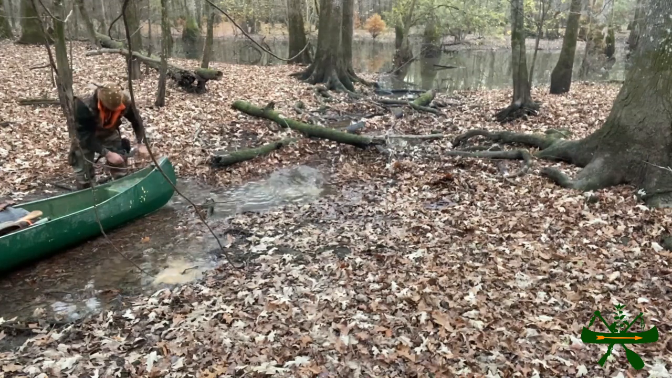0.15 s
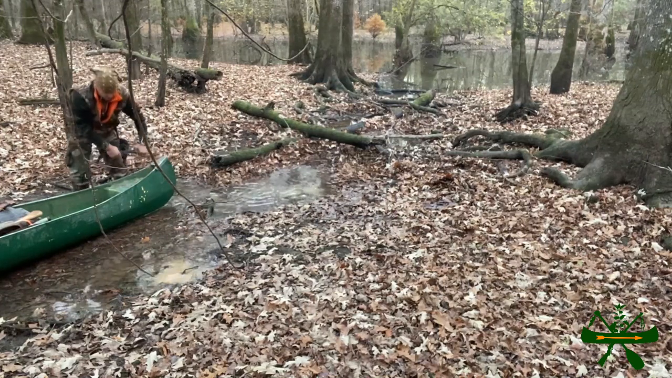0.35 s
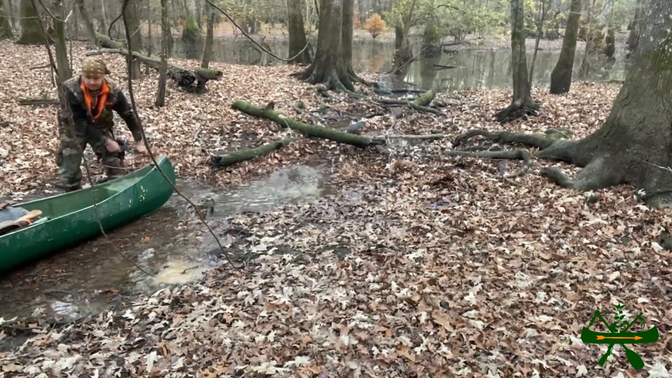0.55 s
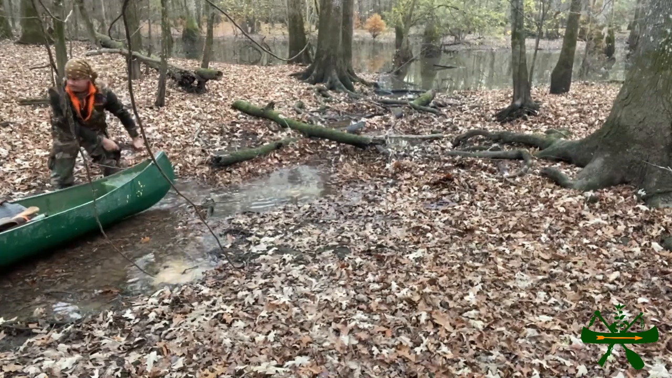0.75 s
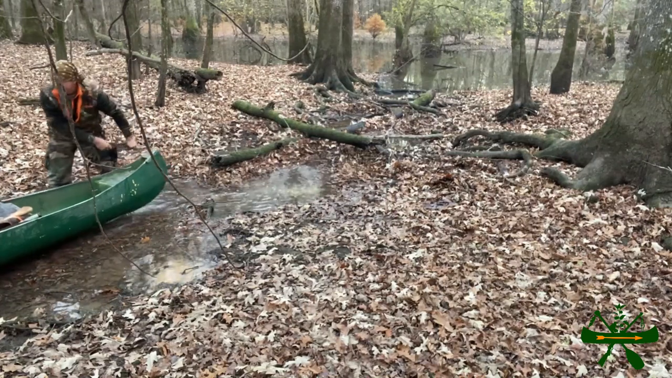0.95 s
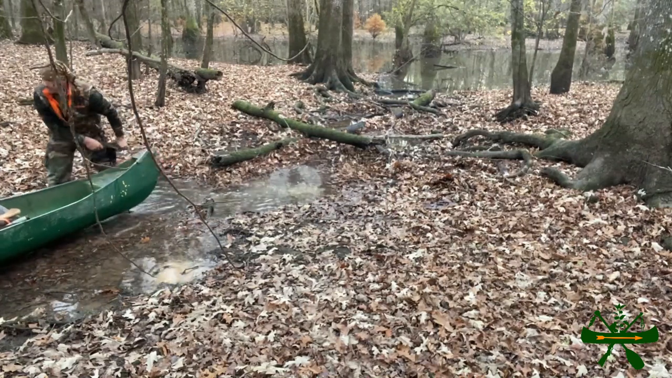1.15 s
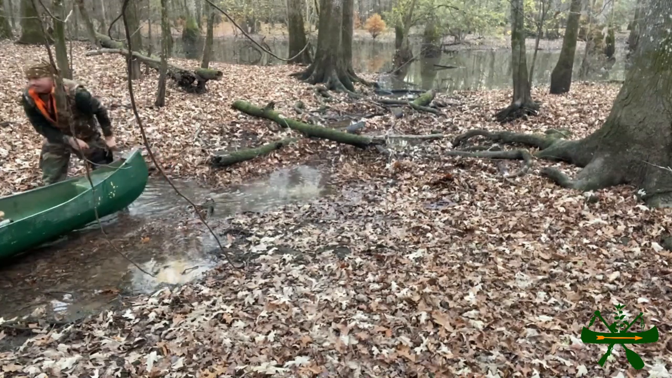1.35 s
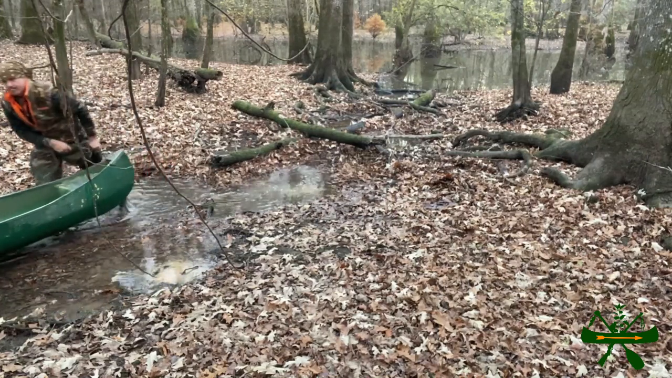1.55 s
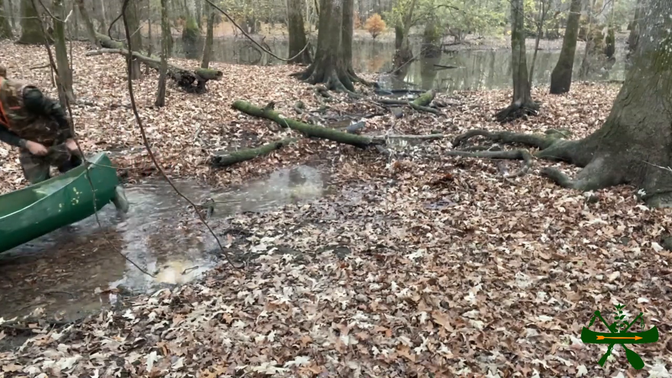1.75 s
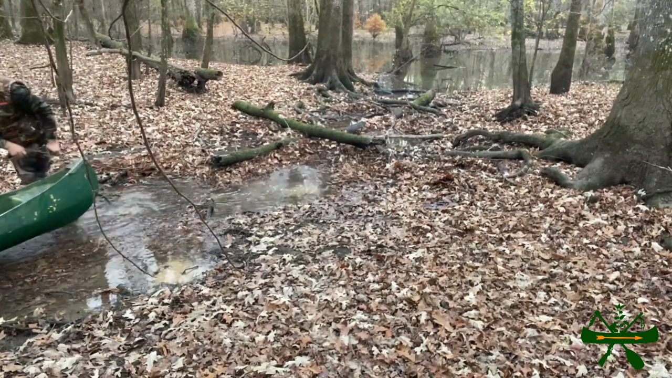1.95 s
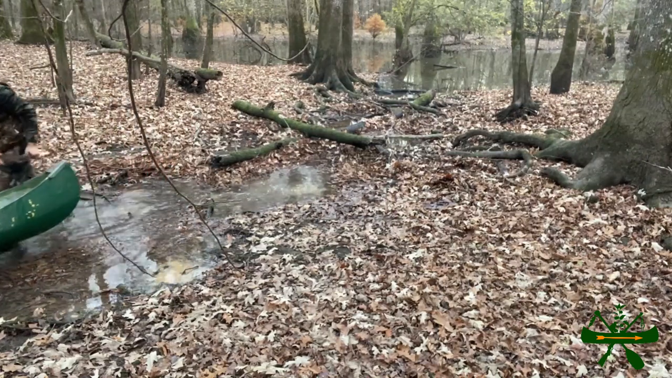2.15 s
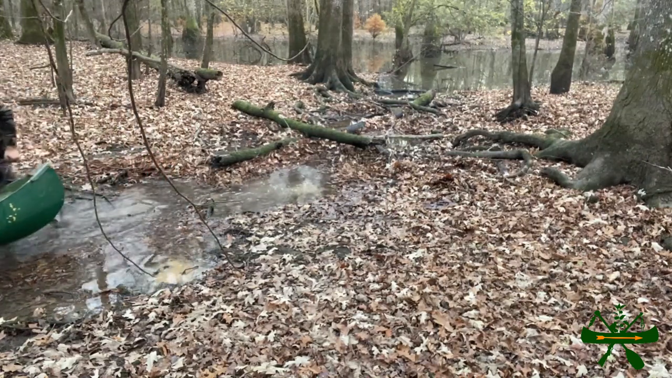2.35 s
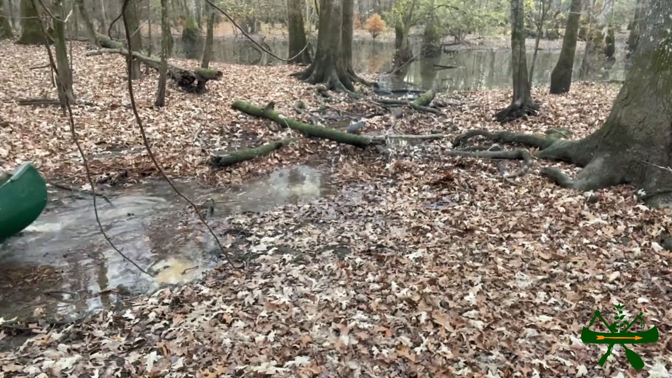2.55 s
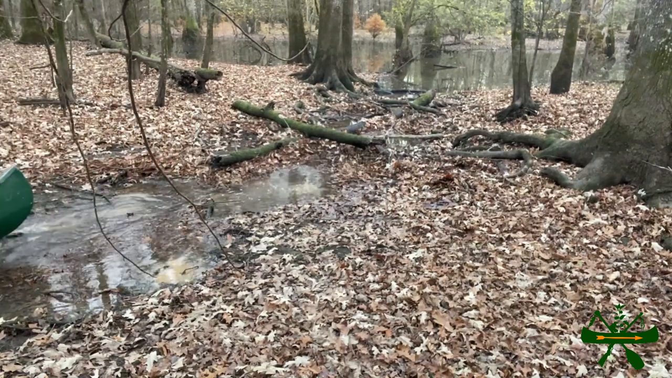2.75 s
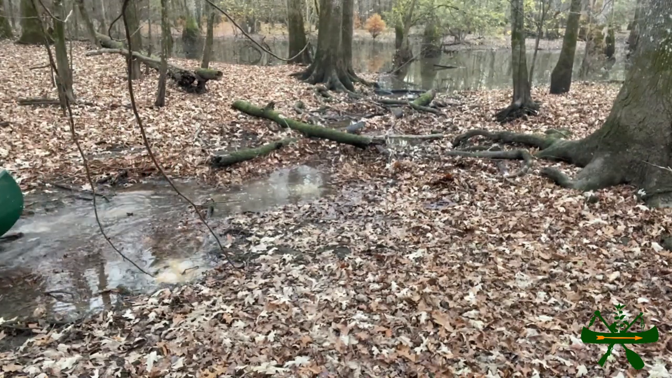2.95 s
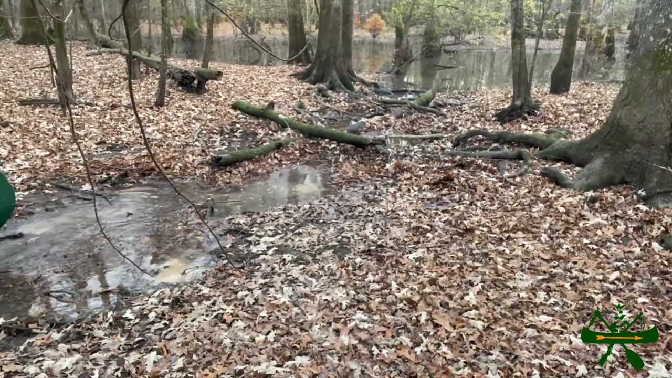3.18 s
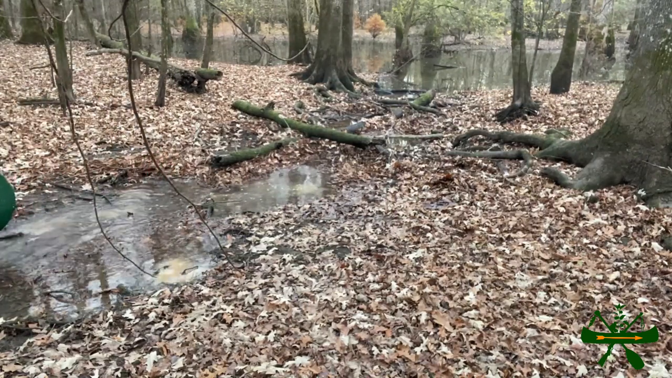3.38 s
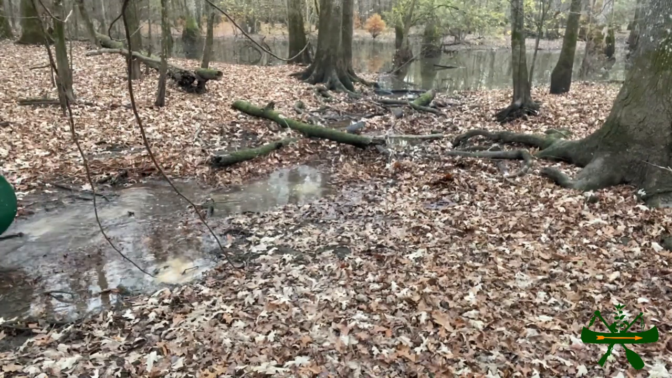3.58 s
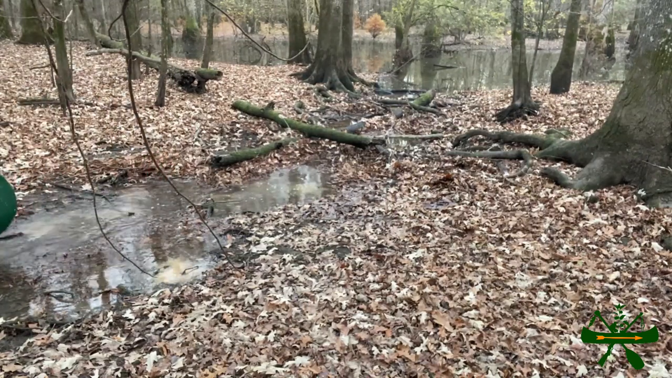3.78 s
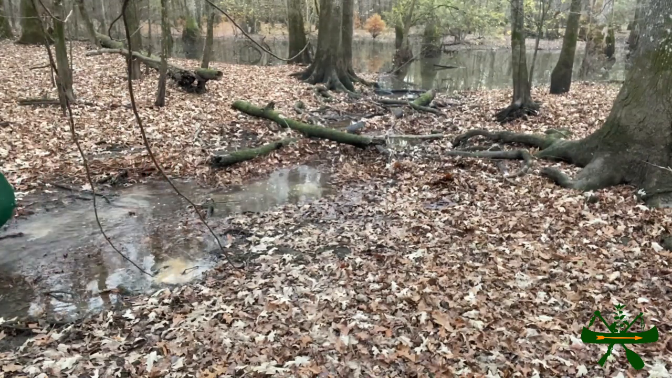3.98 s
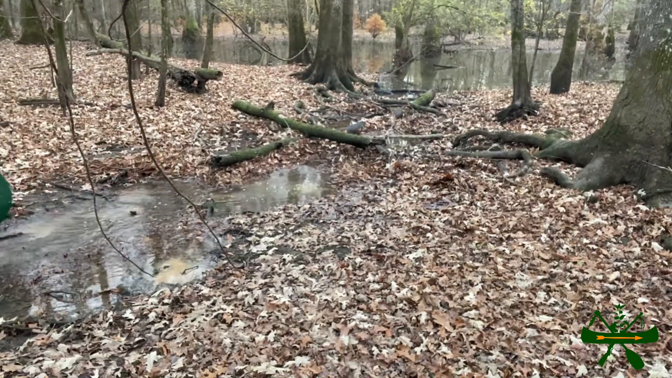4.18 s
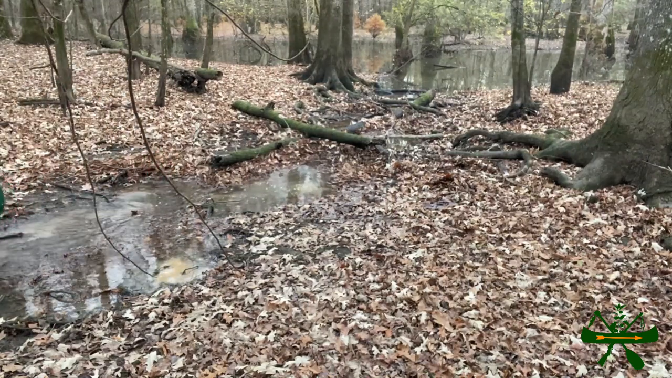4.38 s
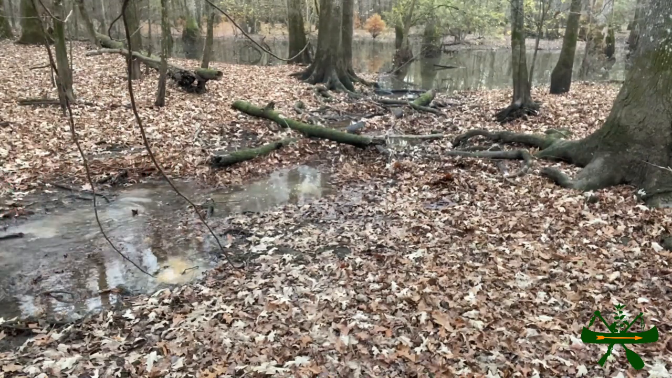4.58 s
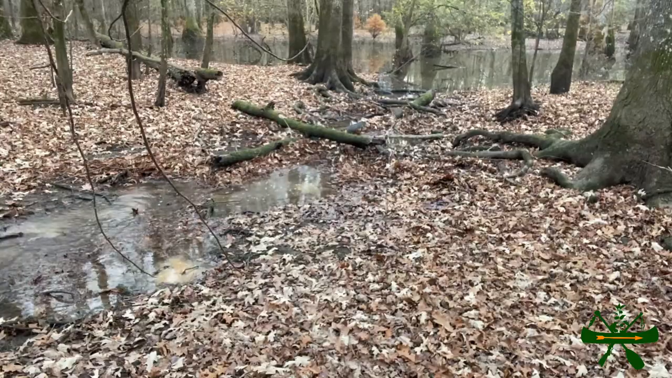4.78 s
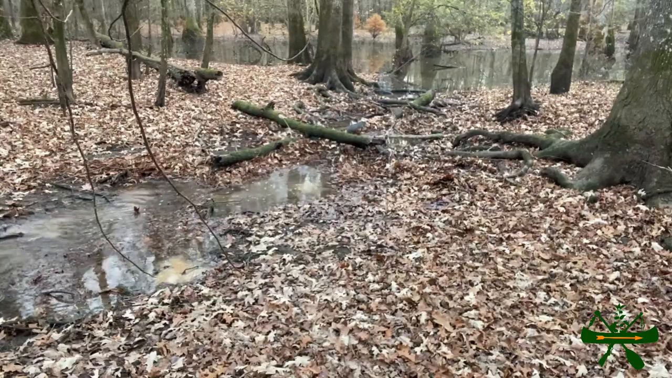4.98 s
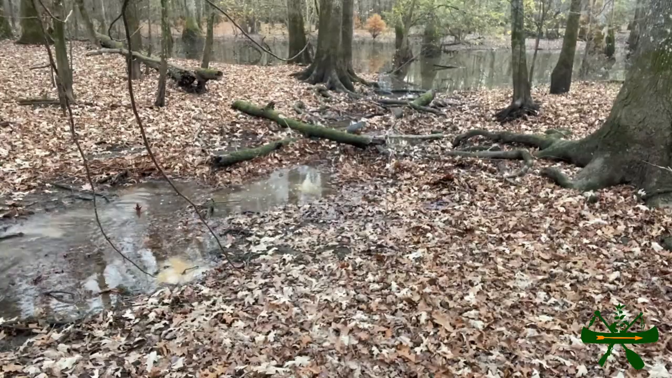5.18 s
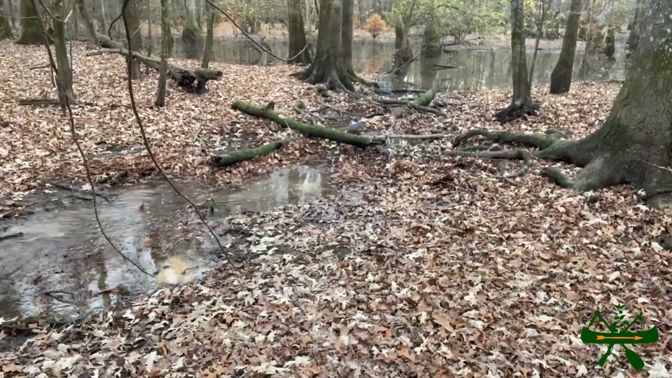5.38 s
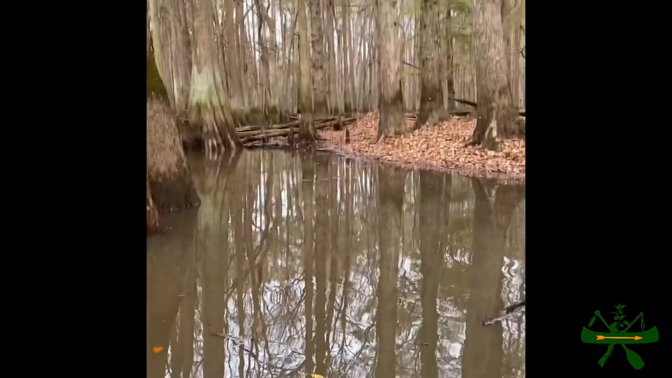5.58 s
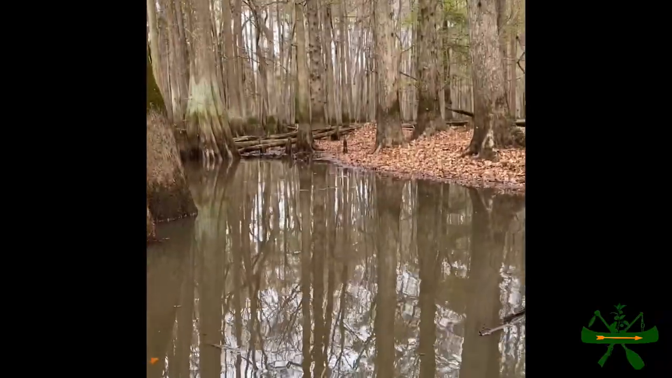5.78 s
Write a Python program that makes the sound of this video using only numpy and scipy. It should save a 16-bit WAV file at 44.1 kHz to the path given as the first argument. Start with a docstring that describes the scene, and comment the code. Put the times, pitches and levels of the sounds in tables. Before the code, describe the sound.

Wet, gritty dragging of a boat builds close by, hollow hull bangs ring out, then fainter sliding, small crackles and near silence.

```python
"""A canoe is dragged through a swamp forest, each sound shaped from noise or decaying sines.
A soft start grows into a near scrape over wet leaves and shallow water: friction noise with a keel hum.
Knocks ring the hull modes amid snapping twigs, rustles and short tones, mostly bubbles and drips.
The near scrape stops short; the boat slides on further away, fainter, over a low drone and faint hiss.
At the end the level dips briefly and the place changes to a duller stretch of still water."""
import sys
import numpy as np
from scipy import signal
from scipy.fft import rfft, irfft, next_fast_len
from scipy.io import wavfile
from scipy.ndimage import uniform_filter1d

SR = 44100
rng = np.random.default_rng(int(sys.argv[2]) if len(sys.argv) > 2 else 0)


def inscribe(sig):
    """Save sig as 16-bit PCM at rate SR to the path in sys.argv[1].

    A 1-D sig is mono; a 2-D sig holds one channel per row.
    Samples are clipped to [-1, 1] before scaling.
    """
    pcm = np.round(np.clip(np.atleast_2d(sig).T, -1, 1) * 32767)
    wavfile.write(sys.argv[1], SR, pcm.astype(np.int16))


N = 256918  # samples

# All levels are those at the source, before the microphone; spectra are relative.
# how hard the hull drags, heard as the scrape level, one list a stretch: time_s, scrape_db
SLIDES = [
    [(0.0, -60), (0.37, -64.5), (0.597, -58)],
    [(0.6, -50), (0.75, -50), (0.98, -46.5), (1.74, -42), (2.52, -45), (2.7, -46.5)],
    [(2.7, -61.5), (3.2, -63.5), (3.45, -62), (3.65, -69), (3.9, -67.5), (4.2, -65), (4.5, -60.5),
     (4.87, -58.5), (5.3, -57.5), (5.5, -60)],
    [(5.505, -58.5), (5.667, -62.5), (5.826, -62.5)],
]
# rumble and fizz at the hardest drag of each stretch: hull_rumble_db, leaf_and_water_fizz_db
STRONGEST = [(-48.5, -62.5), (-49, -45), (-64.5, -55), (-58, -69)]
# friction spectrum of each stretch: frequency_hz, density_db
START_SPECTRUM = [(24, -39), (40, -6.5), (117, -10.5), (213, -24.5), (418, -19), (564, -21), (655, -14),
                  (3580, -35.5), (15600, -55)]
NEAR_SPECTRUM = [(24, -57.5), (40, -25), (64, 1), (179, 4), (334, -9), (1140, -6.5), (1290, -12),
                 (1970, -3.5), (2520, -14.5), (8370, -16.5), (15600, -36)]
AWAY_SPECTRUM = [(24, -50), (40, -11), (61, -4.5), (150, 7.5), (624, -26), (930, -17.5), (1650, -10.5),
                 (2400, -20.5), (4830, -2), (9020, -3.5), (15600, -20)]
STILL_SPECTRUM = [(24, -34), (40, 1), (80, -2), (147, -1), (183, -8), (408, -12.5), (624, -16), (1050, -20),
                  (1160, -21.5), (1780, -15), (2790, -36), (15600, -46)]
# broad resonant humps on each spectrum: centre_hz, width_hz, lift_db
START_HUMPS = [(1830, 710, 8.4), (3500, 400, 5.8)]
NEAR_HUMPS = [(1030, 370, -1), (2100, 690, -2), (3830, 800, 8.5), (5200, 400, 0.5), (6610, 200, 4)]
AWAY_HUMPS = [(619, 305, 17), (1320, 240, 3.5), (2400, 130, -5), (3160, 270, 3.5), (4100, 260, 4.5),
              (6500, 100, -2)]
STILL_HUMPS = [(537, 240, 3), (1790, 75, 9), (3430, 400, 7.4)]
# bending modes of the hull, before each blow alters them: frequency_hz, level_db, t60_s
HULL_MODES = [(100, -17, 0.28), (141.6, 0, 0.14), (164, -1, 0.12), (216.2, -0.5, 0.14), (243.7, -2.5, 0.12),
              (309.3, -2.5, 0.099), (339.7, -2.5, 0.1), (424.7, -6, 0.1), (469.3, -9, 0.19), (548, -9, 0.1),
              (699.5, -5, 0.091), (758, -14.5, 0.26), (828.4, -9.5, 0.11), (845, -16, 0.24),
              (1000, -14, 0.13), (1083, -7.5, 0.095), (1184, -8, 0.084), (1357, -12.5, .07),
              (1430, -16.5, 0.13), (1629, -11, 0.11), (1727, -10.5, 0.11), (1764, -6.5, 0.068),
              (1933, -9, 0.11), (2020, -18, 0.18), (2261, -10.5, 0.055), (2420, -23, 0.03),
              (3294, -24, 0.035), (3280, -27, 0.11)]
# blows on the hull: start_s, modes_peak_db, hardness_db_per_octave, favoured_mode_hz, ring_factor
KNOCKS = [(.002, -34.5, -6, 140, 0.67), (.246, -43, -2.5, 120, 0.63), (0.596, -29.5, -2, 207, 0.42),
          (1.042, -39, -13, 113, 1.6), (1.0481, -28, -0.5, 163, .45), (1.081, -30, -2.5, 144, 0.38),
          (1.119, -32, -1, 248, 0.44), (1.335, -31, 1, 250, 0.6), (1.415, -30, 1.5, 250, 0.35),
          (1.857, -27.5, -5.5, 199, 0.5), (1.9261, -7, -2, 174.5, 0.66), (1.955, -13.5, -2.5, 127.5, 0.72),
          (2.157, -4.5, 0.15, 172, 0.54), (2.2, -11.5, -2, 208, 0.88), (2.963, -31, -1, 214, 1.3),
          (3.01, -31.5, -4.5, 165, 2), (3.048, -32, -2, 165, 1.4), (3.086, -23.5, -0.5, 179, 0.42),
          (3.111, -34, -2.2, 152, 1.9), (3.434, -50.5, -14, 144, 2.1), (3.907, -43.5, -8, 142, 0.26),
          (3.929, -43.5, -7, 137, 0.8), (3.95, -49, -5, 150, 0.79), (4.805, -48, -3.5, 170, .5),
          (5.27, -48, -2, 170, .6), (5.44, -48.5, -3, 170, .6)]
# leaves and twigs snapping: start_s, nominal_peak_db, centre_hz
SNAPS = [(0.1523, -42, 6050), (.3326, -52, 6000), (0.5958, -22, 2860), (0.7146, -30, 3640),
         (2.1584, -22, 2500), (2.8382, -27.5, 4500), (3.0362, -39, 5030), (3.0827, -23.5, 4740),
         (3.111, -33, 4000), (3.306, -37.5, 5100), (3.389, -36, 5830), (3.4336, -39.5, 5020),
         (3.552, -46, 4000), (3.82, -47.5, 6000), (3.866, -46.5, 2960), (4.007, -49, 4200),
         (4.1644, -46, 5460)]
# leaves rustling and water stirred: start_s, rms_db before shaping, centre_hz, length_s
RUSTLES = [(.075, -60, 1430, 0.078), (0.169, -59.5, 1500, 0.044), (0.241, -62, 1190, 0.055),
           (1.035, -47, 600, 0.14), (2.81, -48, 6270, 0.087), (2.99, -38.5, 85, 0.14),
           (3.029, -52, 1330, 0.13), (3.178, -64, 4470, 0.04), (3.287, -67.5, 6000, 0.059),
           (3.352, -60, 5940, .07), (3.571, -65, 6020, 0.055)]
# bubbles, drips and one narrow, pitched snap near 3.5 kHz: start_s, nominal_peak_db, starting_pitch_hz
SHORT_TONES = [(.133, -44.5, 2510), (.185, -47, 2530), (0.754, -38, 1810), (.926, -30.5, 3470),
               (1.22, -33.5, 1035), (2.327, -27.5, 930), (3.946, -53, 1727), (4.003, -48.5, 450),
               (4.025, -44, 563), (4.314, -45, 4150), (4.315, -50, 3300), (5.543, -55, 1830)]
# treble bands lifted by the microphone: centre_hz, width_hz, lift_db
MICROPHONE_HUMPS = [(5080, 740, 5), (8600, 600, 2.5)]

RUMBLE_FOLLOWS, FIZZ_FOLLOWS = 0.87, 1.86  # dB lost for each dB that the scrape loses
# the keel hums as it rubs: final pitch, level over the scrape, depth of its slow swell
KEEL_HZ, KEEL_DB, KEEL_SWELL_DB = 1983, -8.5, 0.5
KEEL_START_HZ, KEEL_CLIMB_S = 1602, .15  # it climbs as the boat gathers speed
FAR_FROM_S = 2.7  # later blows land on the wide middle of the hull, which rings lower and rubs less
SNAP_T60_S = 0.022
# lower tones, as of larger bubbles, ring longer and climb faster; values at 1 kHz (s, octaves a second)
TONE_T60_S, TONE_RISE = 0.038, 1.7
FAR_RUMBLE_DB, AIR_DB = -61.5, -76.5  # low drone of the distance, mean level of the air hiss
MOVE_AT_S = 5.505  # the place changes
EDGE_HZ = 15750  # upper band limit


def gain_of(db):
    """Decibel law: 20 dB is a tenfold amplitude."""
    return 10 ** (np.asarray(db) / 20)


def evened(x):
    """Normalisation to unit rms."""
    return x / np.sqrt(np.mean(abs(x) ** 2) + 1e-20)


def smooth_noise(count, size):
    """Low-pass filtering: noise averaged twice leaves a slow random curve of unit rms."""
    once = uniform_filter1d(rng.standard_normal(count), size=size)
    return evened(uniform_filter1d(once, size=size))


def read(points, hz):
    """Interpolation of a spectrum along log frequency."""
    f, value = np.transpose(points)
    return np.interp(np.log(hz + 1), np.log(f + 1), value)


def lift_db(humps, hz):
    """Resonance: a sum of bell-shaped lifts."""
    return sum(db / (1 + (2 * (hz - centre_hz) / width_hz) ** 2) for centre_hz, width_hz, db in humps)


def band_noise(count, hz, spread):
    """Band-pass filtering: unit-rms noise between hz / spread and hz * spread."""
    band = signal.butter(2, [hz / spread, min(hz * spread, 20000)], "band", fs=SR)
    return evened(signal.lfilter(*band, rng.standard_normal(count)))


def add(mix, s, sound):
    """Superposition: adds a sound to the mix from time s."""
    part = mix[max(round(s * SR), 0):][:len(sound)]
    part += sound[:len(part)]


def slide(rows, strongest, spectrum, humps, patchy_db, flicker_db, grit):
    """Sliding friction: countless slips make noise whose rumble, scrape and fizz follow the drag."""
    s, scrape_db = np.transpose(rows)
    eased_db = scrape_db - scrape_db.max()
    rumble_db = strongest[0] + RUMBLE_FOLLOWS * eased_db
    fizz_db = strongest[1] + FIZZ_FOLLOWS * eased_db
    t = np.arange(s[0], s[-1], 1 / SR)

    # tiny slips, a few of them larger
    slip_db = grit * np.minimum(rng.exponential(1, len(t)), 6)
    slips = rng.standard_normal(len(t)) * gain_of(slip_db)

    # colour the noise, with patches that vary in time and frequency
    hz, frames, z = signal.stft(slips, SR, nperseg=1024, noverlap=896)
    patches = rng.standard_normal((len(hz), len(frames)))
    patches = uniform_filter1d(patches, size=14, axis=0)
    patches = evened(uniform_filter1d(patches, size=14, axis=1))
    colour_db = read(spectrum, hz) + lift_db(humps, hz)
    z = z * gain_of(colour_db[:, None] + patchy_db * patches)

    # the contact with the leaves comes and goes many times a second
    flicker = smooth_noise(len(t), 500)
    low = 1 / (1 + (hz / 300) ** 8)
    high = 1 / (1 + (2800 / (hz + 1)) ** 12)
    out = np.zeros(len(t))
    # each layer: share of the power, level, and how far the flicker reaches it
    layers = [(low, rumble_db, .3), (1 - low - high, scrape_db, 1), (high, fizz_db, 1)]
    for share, level_db, shake in layers:
        layer_z = z * np.sqrt(abs(share))[:, None]
        layer = signal.istft(layer_z, SR, nperseg=1024, noverlap=896)[1][:len(t)]
        layer = evened(layer * gain_of(shake * flicker_db * flicker))
        out += layer * gain_of(np.interp(t, s, level_db))
    edge = np.minimum(np.minimum(t - s[0], s[-1] - t) / 0.00073 + 0.39, 1)  # near-abrupt ends
    return s[0], out * edge


def keel():
    """Frequency shifting: narrow low-pass noise moved up to a gliding pitch is a fuzzy hum."""
    s, scrape_db = np.transpose(SLIDES[1])
    t = np.arange(s[0], s[-1], 1 / SR)
    pole = np.exp(-np.pi * 230 / SR)  # 230 Hz bandwidth
    real, imaginary = rng.standard_normal((2, len(t)))
    swell = smooth_noise(len(t), 3000)
    hz = KEEL_HZ - (KEEL_HZ - KEEL_START_HZ) * np.exp(-(t - s[0]) / KEEL_CLIMB_S)
    carrier = np.exp(2j * np.pi * np.cumsum(hz) / SR)
    hum = signal.lfilter([1], [1, -pole], real + 1j * imaginary) * carrier
    level_db = np.interp(t, s, scrape_db) + KEEL_DB + KEEL_SWELL_DB * swell
    return s[0], gain_of(level_db) * evened(hum.real)


def knock(peak_db, hardness_db, favoured_hz, ring, pitch, rub):
    """Modal vibration: bending waves spread unevenly, so treble speaks at once and bass swells later."""
    hz, db, t60 = np.transpose(HULL_MODES)[:, :, None]
    hz = hz * np.where(hz > 600, pitch, 1)
    t = np.arange(round(.35 * SR)) / SR
    ring = max(ring, .1)

    # each blow lands on another spot, which favours the low mode that bends most there
    touch = rng.standard_normal((len(HULL_MODES), 2))
    spot_db = lift_db([(favoured_hz, 34, 9)], hz) + 1.4 * touch[:, :1]
    level_db = db + spot_db + hardness_db * np.log2(hz / 200) - 60 * t / (t60 * ring)
    swell = (1 - np.exp(-t * hz / 1.08)) ** 2

    # the hull keeps rubbing as it rings, which shakes the phase, most of all of the upper modes
    shake = uniform_filter1d(rng.standard_normal((len(HULL_MODES), len(t))), size=60, axis=1)
    drift = .06 * rub * np.cumsum(shake, axis=1) * np.minimum(hz / 500, 1) ** 2
    phase = 2 * np.pi * hz * (1 + 0.0042 * touch[:, 1:]) * t + drift
    modes = (gain_of(level_db) * swell * np.sin(phase)).sum(0)

    # the many small panels between the ribs add a dull rattle
    band = signal.butter(2, [250, 2300 * pitch], "band", fs=SR)
    rattle = signal.lfilter(*band, rng.standard_normal(len(t)))
    rattle *= rub * gain_of(-4.0 + 1.3 * hardness_db - 60 * t / (0.13 * ring))
    return gain_of(peak_db) * (modes + rattle) / abs(modes).max()


def snap(peak_db, hz, t60):
    """Impulsive fracture: a burst of noise around one centre, dying quickly."""
    t = np.arange(round(.15 * SR)) / SR
    level_db = peak_db - 12 - 60 * t / max(t60, .003)  # 12 dB from peak down to rms
    return gain_of(level_db) * band_noise(len(t), hz, 1.57) * np.minimum(t / 0.00055, 1)


def rustle(db, hz, length):
    """Random superposition: a dense clump of crackles starts quickly and thins out."""
    u = np.arange(round(.15 * SR)) / SR / length  # share of the length gone by
    clumps = evened(uniform_filter1d(rng.standard_normal(len(u)), size=200))
    shape = np.minimum(u / 0.068, 1) * np.clip(1 - u ** 1.4, 0, 1)
    return gain_of(db + 2.0 * clumps) * band_noise(len(u), hz, 1.68) * shape


def rising_tone(peak_db, hz, t60, rise):
    """Damped resonance: a short tone climbs in octaves a second, as a bubble does nearing the surface."""
    t = np.arange(round(.15 * SR)) / SR
    tone = np.sin(2 * np.pi * np.cumsum(hz * 2 ** (rise * t)) / SR)
    return gain_of(peak_db - 60 * t / max(t60, .005)) * tone * np.minimum(t / 0.0014, 1)


def squeezed_bubbles():
    """Bubble resonance in number: small bubbles squeezed from the leaves follow the scrape level."""
    s, scrape_db = np.transpose(np.concatenate(SLIDES[:3]))
    out = np.zeros(N)
    for at, pitch, size in rng.random((260, 3)):
        start = at * (s[-1] - .05)
        hz = 400 * 2 ** (4.0 * pitch)
        peak_db = np.interp(start, s, scrape_db) - 4 + 9 * size
        add(out, start, rising_tone(peak_db, hz, 30 / hz + 0.013, 3.7))
    return out


def ticks():
    """Random impulses: faint droplets and leaf tips tick here and there in the first place."""
    out = np.zeros(N)
    for at, pitch, size in rng.random((70, 3)):
        tick = snap(-62 + 10 * size ** 2, 3500 * 2 ** (1.5 * pitch), .012)
        add(out, at * (MOVE_AT_S - .05), tick)
    return out


def ambience():
    """Filtered noise: a steady far-off drone, and a faint bright hiss that ends with the first place."""
    drone = gain_of(FAR_RUMBLE_DB) * band_noise(N, 73.0, 1.3)
    stir = evened(uniform_filter1d(rng.standard_normal(N), size=1500))
    hiss = gain_of(AIR_DB + 1.5 * stir) * band_noise(N, 9000, 1.4)
    return drone + hiss * (np.arange(N) / SR < MOVE_AT_S)


def forest(x):
    """Scattering: trunks and water throw back sparse, dull, decaying echoes, made by convolution."""
    t = np.arange(round(.3 * SR)) / SR
    sparse = rng.standard_normal(len(t)) * (rng.random(len(t)) < .05)
    echoes = sparse * gain_of(-60 * t / 0.18) * (t > .008)
    echoes = signal.lfilter([1], [1, -.6], echoes)  # dulls them
    return signal.fftconvolve(x, echoes / np.linalg.norm(echoes))[:N]


def scene():
    """Superposition of slides, blows, snaps, rustles and short tones; the separate events echo."""
    ground, events = squeezed_bubbles() + ticks() + ambience(), np.zeros(N)
    # each stretch: spectrum, humps, patchy_db, flicker_db, grit_db
    stretches = [
        (START_SPECTRUM, START_HUMPS, 0.0, 1.9, 1.1),
        (NEAR_SPECTRUM, NEAR_HUMPS, 1.57, -0.24, 2.5),
        (AWAY_SPECTRUM, AWAY_HUMPS, 1.1, 1.0, 2.56),
        (STILL_SPECTRUM, STILL_HUMPS, 1.2, .8, 1.5),
    ]
    for rows, strongest, stretch in zip(SLIDES, STRONGEST, stretches):
        add(ground, *slide(rows, strongest, *stretch))
    add(ground, *keel())

    for s, *row in KNOCKS:
        pitch, rub = (.81, .45) if s > FAR_FROM_S else (1, 1)
        add(events, s, knock(*row, pitch, rub))
    for s, db, hz in SNAPS:
        add(events, s, snap(db, hz, SNAP_T60_S))
    for s, db, hz in SHORT_TONES:
        t60 = TONE_T60_S * (1000 / hz) ** 0.52
        add(events, s, rising_tone(db, hz, t60, TONE_RISE * 1000 / hz))
    for s, *row in RUSTLES:
        add(events, s, rustle(*row))

    # the level dips to a tenth and returns where the place changes
    dip = np.clip(abs(np.arange(N) / SR - MOVE_AT_S - .004) / .024, .1, 1)
    return (dip * (ground + events + gain_of(-14) * forest(events)))[None]


def record(dry):
    """Transducer response: two treble bands lifted, deep bass lost, then a steep upper band limit."""
    size = next_fast_len(N + 4096)
    hz = np.fft.rfftfreq(size, 1 / SR)
    response = gain_of(lift_db(MICROPHONE_HUMPS, hz))
    coloured = irfft(rfft(dry, size) * response, size)[:, :N]
    coloured = signal.lfilter(*signal.butter(3, 70, "high", fs=SR), coloured)
    band_limit = signal.firwin(1023, EDGE_HZ, window=("kaiser", 10), fs=SR)
    return signal.oaconvolve(coloured, band_limit[None], "same")


dry = scene()
out = record(dry)
inscribe(out)
```